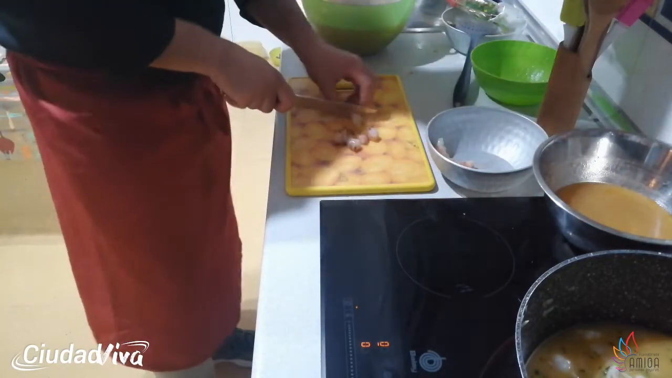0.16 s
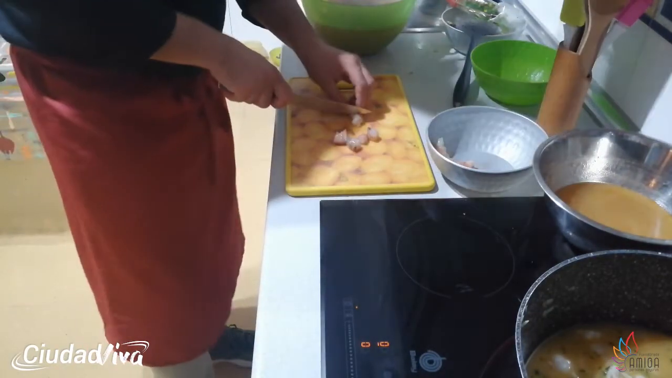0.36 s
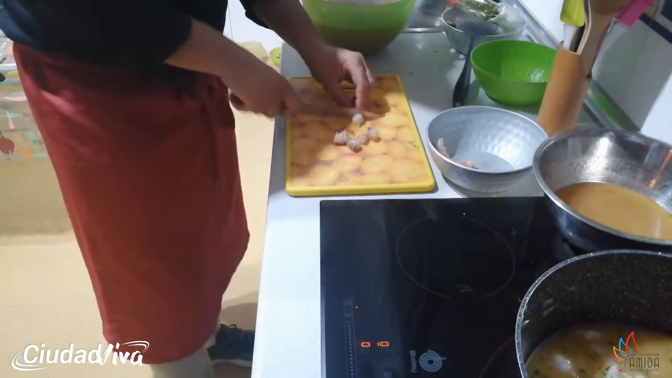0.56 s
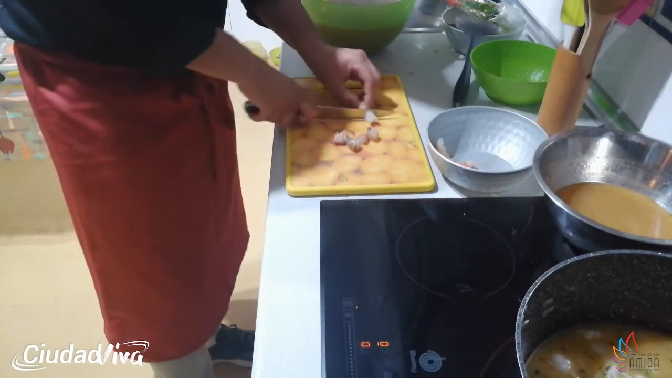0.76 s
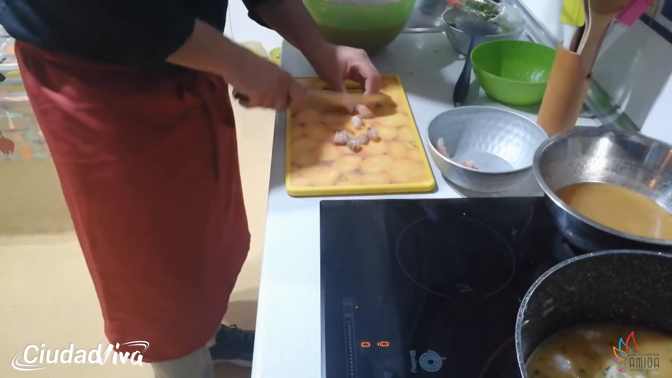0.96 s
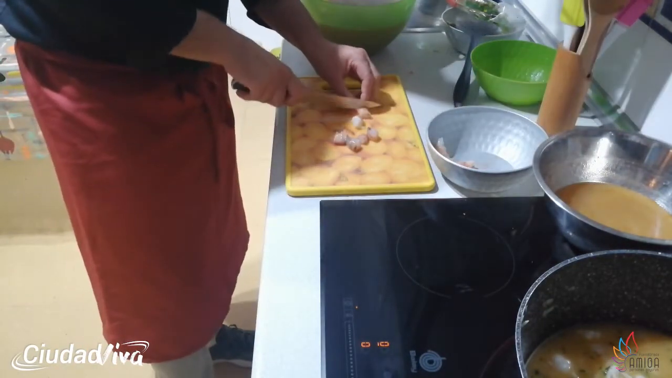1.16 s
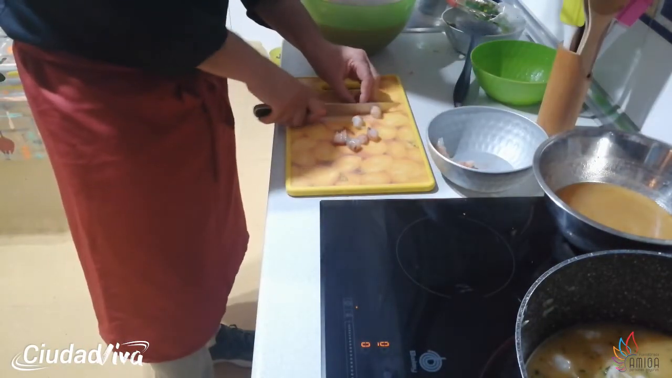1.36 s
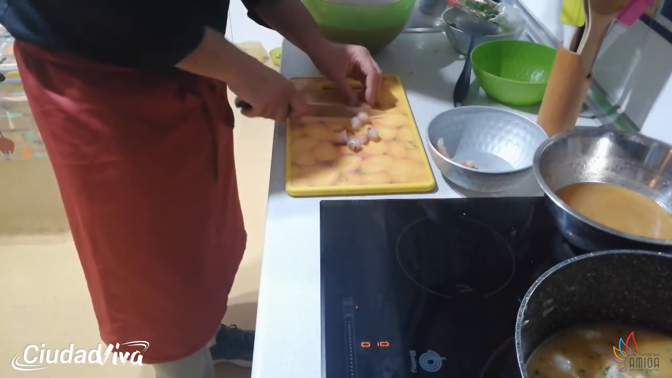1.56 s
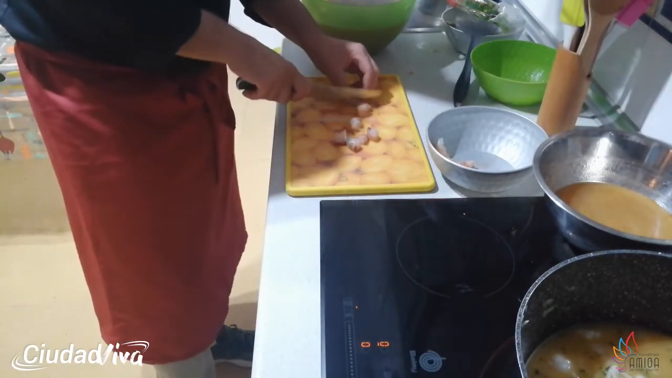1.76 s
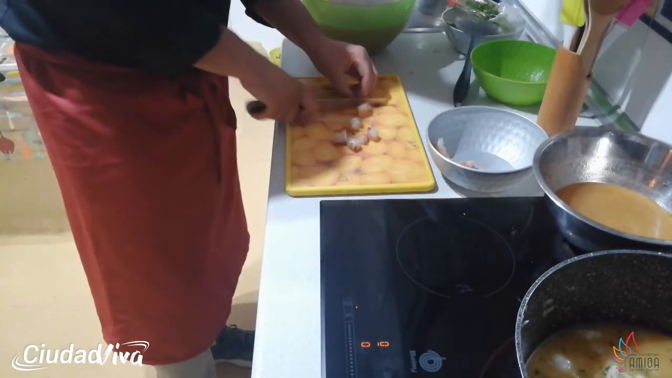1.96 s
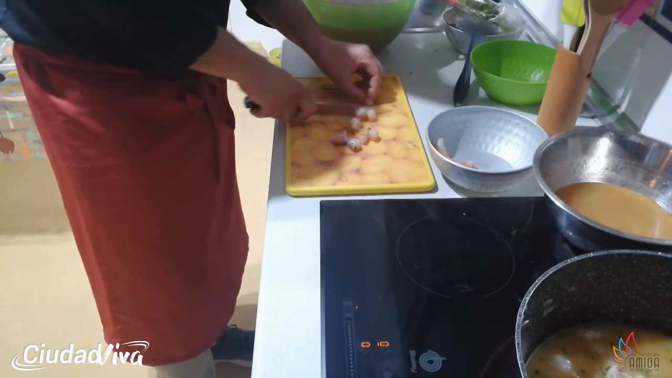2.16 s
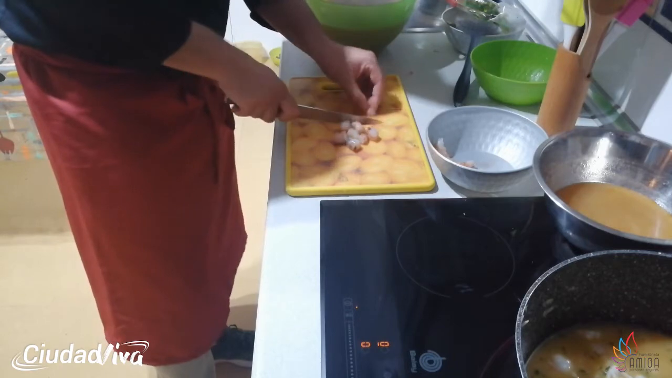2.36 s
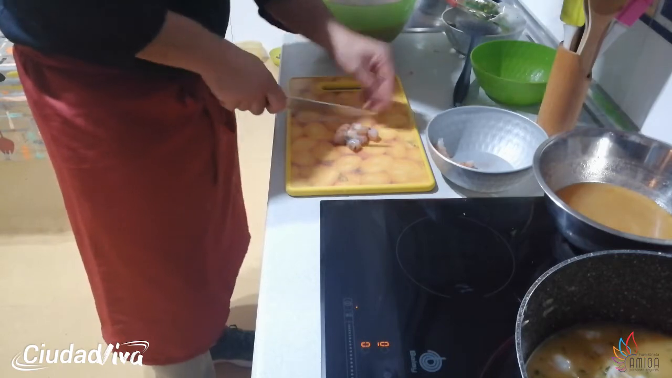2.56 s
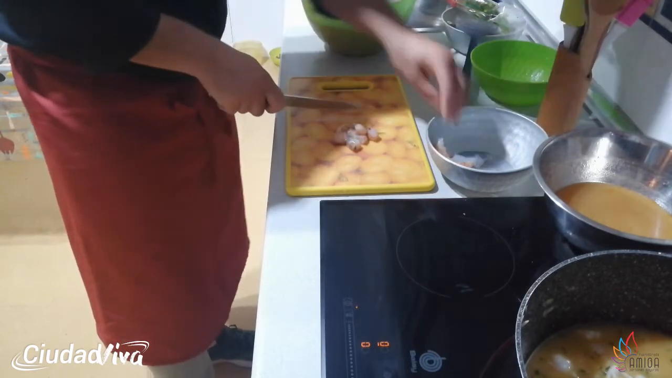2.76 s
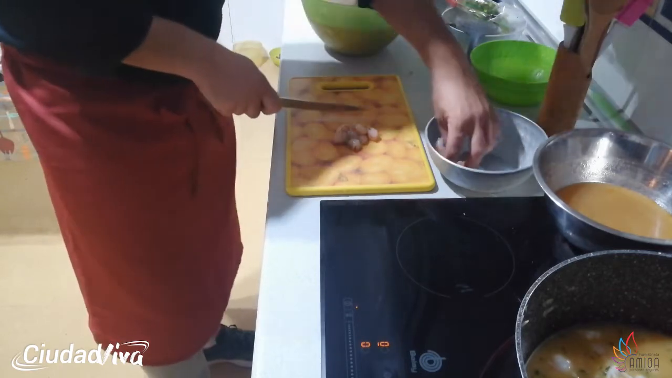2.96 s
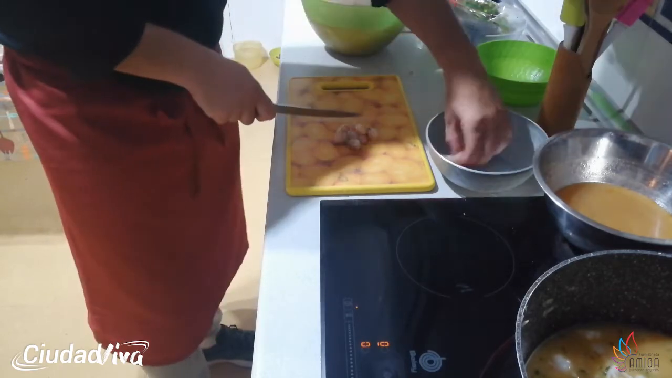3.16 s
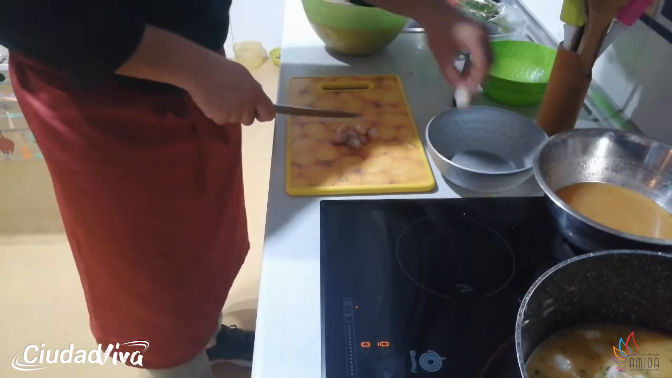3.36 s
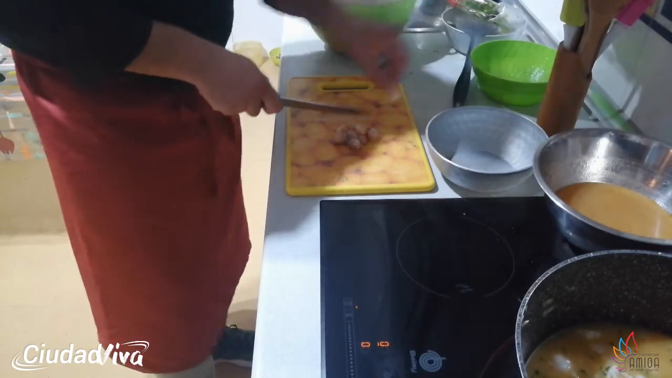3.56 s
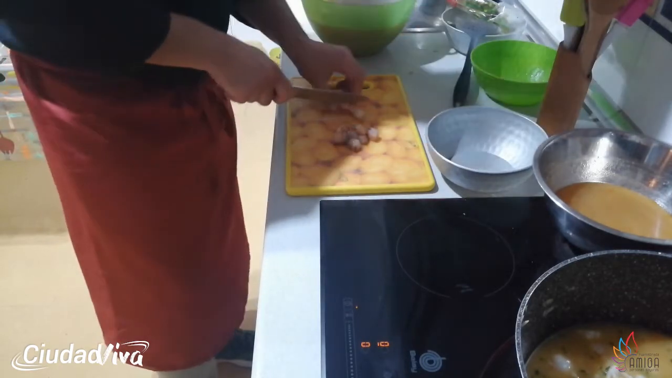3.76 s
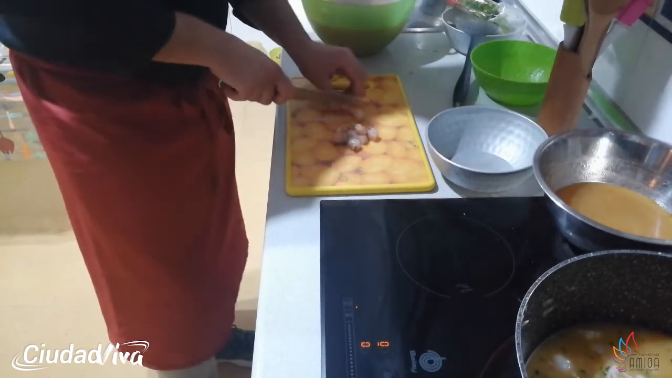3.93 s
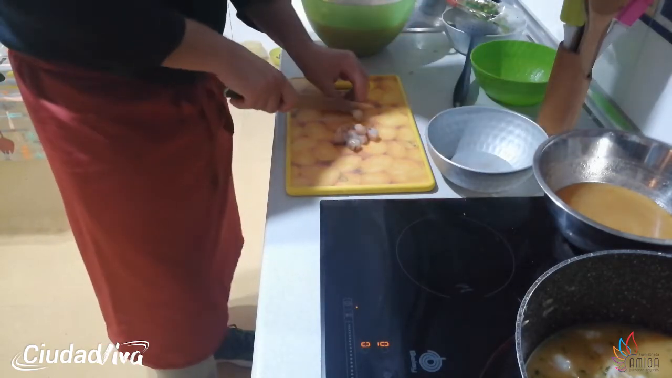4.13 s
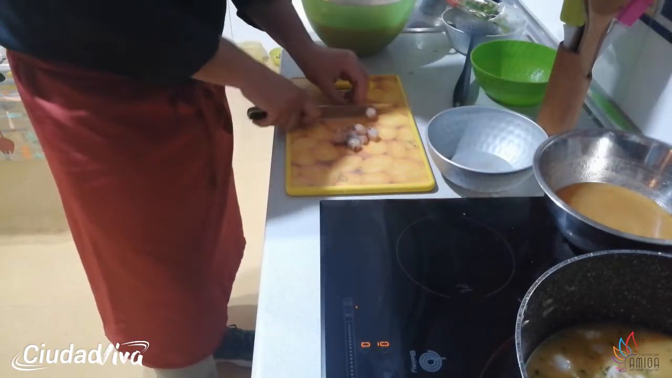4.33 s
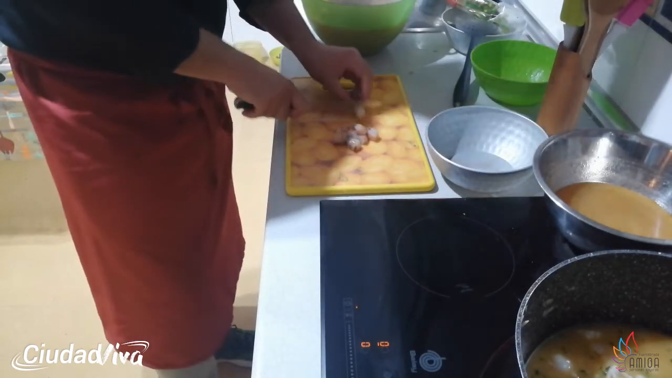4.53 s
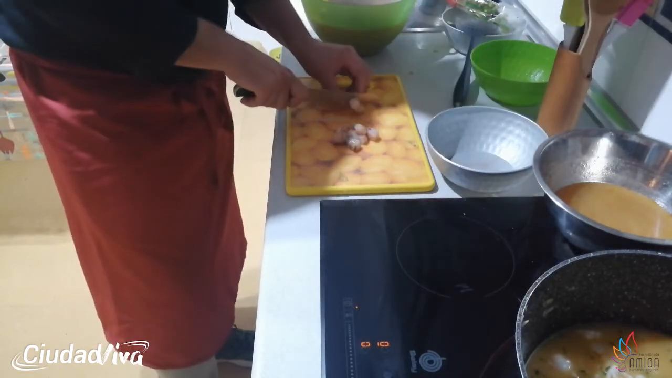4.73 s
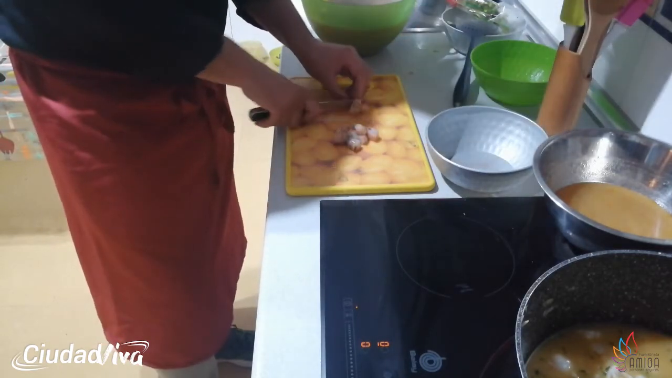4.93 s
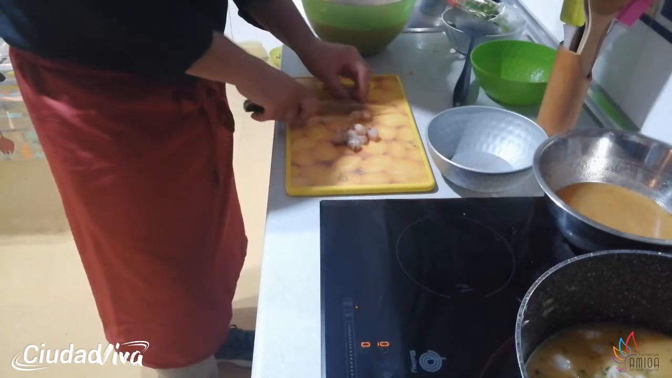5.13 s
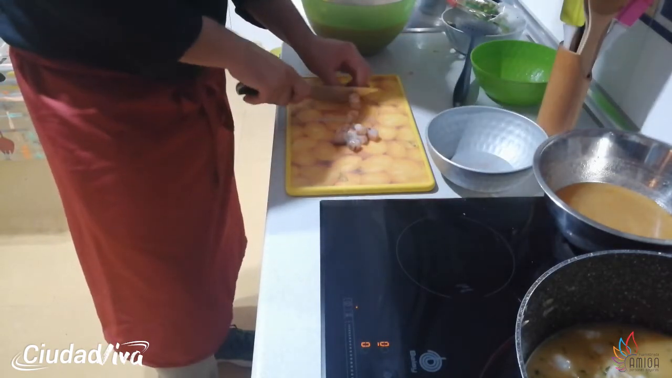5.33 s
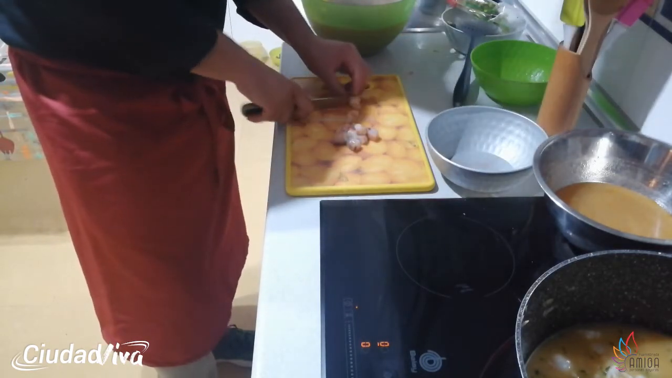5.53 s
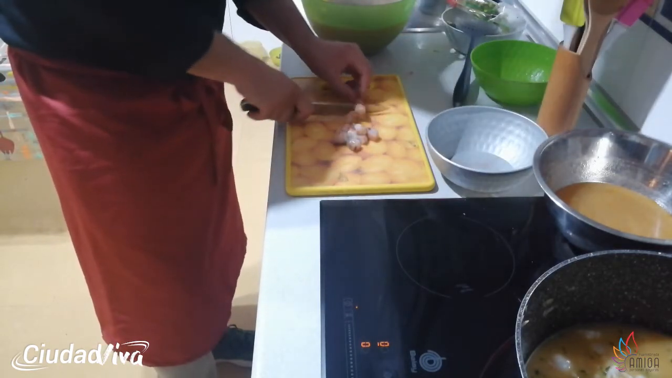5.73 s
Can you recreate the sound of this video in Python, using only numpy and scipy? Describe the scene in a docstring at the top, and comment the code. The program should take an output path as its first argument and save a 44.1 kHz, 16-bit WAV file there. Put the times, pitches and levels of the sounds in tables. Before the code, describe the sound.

Slow knife chops knock on a plastic cutting board, blade hissing between cuts, pieces dropped softly into a metal bowl, quiet kitchen hum.

```python
"""Knife on a plastic board

A small tiled kitchen on one microphone, the same in both channels. Each cut ends in a knock, built from damped
modes and a crunch of noise, and slips of the steel edge hiss, rub the board and ring the blade.
Midway pieces rustle off the fingers and tap a bowl; squeaks are short falling sines. An appliance hums
in steady lines over a rush of air. Room tails answer the knife, fingers and bowl."""
import sys
import numpy as np
from scipy import signal
from scipy.fft import rfft, irfft, next_fast_len
from scipy.io import wavfile
from scipy.ndimage import map_coordinates

SR = 44100
rng = np.random.default_rng(int(sys.argv[2]) if len(sys.argv) > 2 else 0)


def to_wav(s):
    """Save 16-bit WAV."""
    ch = np.atleast_2d(s).T  # columns
    pcm = np.round(np.clip(ch, -1, 1) * 32767)  # PCM
    wavfile.write(sys.argv[1], SR, pcm.astype(np.int16))


N = 259925  # length [samples]
TOP_HZ = 7750  # upper limit of the recorder, and of the modes that hard contact reaches
SPLIT_HZ = 1700  # modes below it make the thud, the others the clack


def amp(db):
    """Amplitude factor of a level in dB."""
    return 10 ** (np.asarray(db) / 20)


def unit(x):
    """Scale x to rms 1."""
    return x / np.sqrt(np.mean(x ** 2) + 1e-20)


def burst(x):
    """Scale a short sound to the energy of 20 ms at rms 1."""
    return x * np.sqrt(SR / 50 / np.sum(x ** 2))


def along(points, hz):
    """Interpolate (frequency [Hz], value) points on a log frequency axis."""
    f, v = np.transpose(points)
    return np.interp(np.log(hz + 1), np.log(f + 1), v)


def filtered(x, response):
    """Multiply the spectrum of x by a response of frequency."""
    n = x.shape[-1]
    padded = next_fast_len(n + 8192)
    spectrum = rfft(x, padded) * response(np.fft.rfftfreq(padded, 1 / SR))
    return irfft(spectrum, padded)[..., :n]


def coloured(x, spectrum):
    """Shape x by (frequency [Hz], relative level [dB]) points, at rms 1."""
    return unit(filtered(x, lambda hz: amp(along(spectrum, hz))))


def band(x, lo_hz, hi_hz):
    """Causal band-pass."""
    sos = signal.butter(2, [lo_hz, hi_hz], "band", fs=SR, output="sos")
    return signal.sosfilt(sos, x)


def wobble(rate, size):
    """A smooth random curve with rate knots a second."""
    knots = rng.standard_normal(size // 20 + 4)
    return map_coordinates(knots, [np.arange(size) * rate / SR], mode="wrap")


def fade(t, t60):
    """Exponential decay that falls 60 dB in t60 seconds."""
    return np.exp(-np.log(1000) * t / t60)


def add(track, s, sound):
    """Mix a sound into the track at time s."""
    start = max(round(s * SR), 0)
    track[start:start + len(sound)] += sound[:N - start]


# the appliance's tonal lines: (frequency [Hz], mean rms level [dB])
HUM_LINES = [(100, -68), (146.5, -70), (198, -79), (243, -57.5), (441, -80.5), (586, -78), (876, -81.5)]
# its rush of air: (frequency [Hz], relative level [dB per Hz])
AIR_SPECTRUM = [(20, -15), (50, -10), (75, -17.5), (130, -8), (190, -16), (300, -15), (500, -16),
                (750, -22.5), (1500, -31.5), (3100, -28), (4270, -37.5), (5770, -25), (7040, -36),
                (7780, -52.5)]


def appliance(air_db):
    """Slightly unsteady motor and mains lines over a soft rush of air."""
    t, hum = np.arange(N) / SR, np.zeros(N)
    for hz, db in HUM_LINES:
        level = .6 * wobble(5, N)  # dB
        drift = .3 * wobble(4, N)  # rad
        hum += amp(db + level) * np.sqrt(2) * np.sin(2 * np.pi * hz * t + drift)
    air_level = amp(air_db + .25 * wobble(41, N))
    return hum + air_level * coloured(rng.standard_normal(N), AIR_SPECTRUM)


# decay of the room: (frequency [Hz], t60 [s])
ROOM_DECAY = [(150, 0.74), (500, 0.46), (1400, 0.36), (3000, 0.39), (7000, 0.38)]


def kitchen(x, wet_db, build):
    """Add a diffuse tail that builds up over build seconds and dies at each frequency's own speed."""
    hz, t, z = signal.stft(rng.standard_normal(SR // 2), SR, nperseg=256)
    decaying = z * fade(t, along(ROOM_DECAY, hz)[:, None])
    tail = signal.istft(decaying, SR, nperseg=256)[1]
    tail = tail * (1 - np.exp(-np.arange(len(tail)) / SR / build))
    return x + amp(wet_db) * signal.fftconvolve(x, tail / np.linalg.norm(tail))[:len(x)]


def near_wall(x, delay, share):
    """Sound bounces three times between the worktop and the nearby walls."""
    def bounces(hz):
        one = np.clip(share, 0, .9) * np.exp(-2j * np.pi * hz * delay)
        return sum(one ** k for k in range(4))  # k = 0 is the direct sound
    return filtered(x, bounces)


# the fingers let go of the pieces: (time of the loudest moment [s], level before colouring and room [dB])
RUSTLES = [(2.921, -62.5), (3.12, -53)]
RUSTLE_RISE_DB_PER_S, RUSTLE_FALL_DB_PER_S = 221, 205


def fingers(grain_db=3):
    """Moist pieces slide off the fingers into the bowl: each rustle swells and dies away."""
    t, level = np.arange(N) / SR, np.zeros(N)
    for s, db in RUSTLES:
        drop_db = np.maximum(RUSTLE_RISE_DB_PER_S * (s - t), RUSTLE_FALL_DB_PER_S * (t - s))
        level += amp(db - drop_db)
    grains = unit(amp(grain_db * wobble(500, N)) * rng.standard_normal(N))
    rustle = coloured(grains, [(300, -12.0), (900, 2), (1600, 0), (3000, -1),
                               (4200, -9.5), (5700, -8), (7000, -9.5), (7800, -32)])
    return kitchen(level * rustle, wet_db=-7, build=.01)


# the wet blade squeaks in the food:
# (time [s], length [s], starting pitch before jitter [Hz], level at the peak of the swell, before room [dB])
SQUEAKS = [(0.848, 0.051, 4500, -71), (.85, 0.2, 1823, -68.5), (0.848, 0.11, 3150, -65),
           (0.883, .046, 6000, -59.5), (1.53, 0.036, 4730, -65), (1.566, 0.024, 5920, -50),
           (4.045, .09, 5210, -64.5)]
SQUEAK_SAG = .055  # share by which the pitch falls during a squeak


def squeaks(jitter):
    """Stick and slip make short, rough, falling whistles; jitter [Hz] roughens the pitch."""
    out = np.zeros(N)
    for s, length, start_hz, db in SQUEAKS:
        size = round(length * SR)
        falling = start_hz * (1 - SQUEAK_SAG * np.linspace(0, 1, size))
        hz = falling + jitter * wobble(520, size)
        whistle = np.sqrt(2) * np.sin(2 * np.pi * np.cumsum(hz) / SR)
        add(out, s, amp(db) * np.hanning(size) * whistle)
    return kitchen(out, wet_db=-1.5, build=0.0096)


def ring(modes, t):
    """Damped sines of the blade; they waver together as it flexes in the hand."""
    flex = .45 * wobble(70, len(t))  # rad
    total = np.zeros(len(t))
    for hz, db, t60 in modes:
        level = amp(db + rng.standard_normal())  # each stroke excites the modes a little differently
        total += level * fade(t, t60) * np.sin(2 * np.pi * hz * t + flex)
    return total


# hiss of the slipping edge: (frequency [Hz], relative level [dB per Hz])
HISS_SPECTRUM = [(1500, -65), (3000, -38), (4200, -11.5), (5200, 0.5), (5700, 5.5), (6300, 1), (6700, -3),
                 (7050, -2.5), (7400, -14), (7800, -16)]
# rub heard from the board: (frequency [Hz], relative level [dB per Hz])
RUB_SPECTRUM = [(150, -28.5), (500, -13.5), (900, -10), (1200, 9), (1700, -5.5), (2200, -3.5), (2700, 6),
                (3300, -1.5), (4500, -23.5), (7000, -35.5)]


def stroke(rise, fall, board_db, rings, grain_db=1.0, hiss_db=-3.5):
    """Tiny slips of the moving edge hiss, rub the board and keep the steel ringing; rings = [(modes, dB)]."""
    t = np.arange(SR * 3 // 5) / SR
    speed = np.interp(t, [0, rise, rise + fall], [0, 1, 0])
    grip = amp(grain_db * wobble(900, len(t)) + wobble(98, len(t)))
    slips = unit(grip * rng.standard_normal(len(t)))
    hiss = amp(hiss_db) * coloured(slips, HISS_SPECTRUM)
    rub = amp(board_db) * coloured(slips, RUB_SPECTRUM)
    rubbing = speed * (hiss + rub)
    for modes, db in rings:
        steel = signal.fftconvolve(speed * slips, ring(modes, t))[:len(t)]
        # scaled to the energy of the speed curve
        rubbing = rubbing + amp(db) * steel * np.linalg.norm(speed) / np.linalg.norm(steel)
    return kitchen(rubbing, wet_db=-6.0, build=0.0061)


# the blade nudges the pieces along, barely touching the board:
# (time [s], length [s], level before the stroke's own trims [dB])
NUDGES = [(0.821, 0.12, -55.5), (1.519, 0.18, -52.5), (2.534, 0.11, -52.5), (3.562, 0.72, -60)]
NUDGE_RISE = 0.31  # share of a nudge in which the edge gathers speed
# modes of the steel, shared by every stroke: (frequency [Hz], mean relative level [dB], t60 [s])
BLADE_MODES = [(1190, -15, .1), (1424, -14, .22), (2530, -17, .24), (2695, -12, .18), (3190, -15, .14),
               (3668, -17, .25), (3885, -21, .27), (4740, -12, .1), (5135, -7, .14), (5262, -5, .1),
               (5440, -2, .12), (5528, -5, .21), (5755, -8, .14), (6360, -7, .18), (7010, -9, .14)]


def nudges(board_db, blade_db):
    """Light strokes are mostly hiss."""
    out = np.zeros(N)
    for s, length, db in NUDGES:
        rise, fall = NUDGE_RISE * length, (1 - NUDGE_RISE) * length
        add(out, s, amp(db) * stroke(rise, fall, board_db, [(BLADE_MODES, blade_db)]))
    return out


# the edge is drawn back over the board: (time [s], length [s], hiss level [dB], board level [dB],
# mode that sings [Hz], its level [dB]); levels before the trims of the scrape and stroke
SCRAPES = [(0.96, 0.047, -54, -63, 2695, -56), (1.605, 0.063, -31, -48, 2695, -44),
           (2.214, 0.091, -29.5, -36, 5528, -32), (2.254, 0.054, -28.5, -56, 6360, -32.5),
           (4.527, 0.082, -39.5, -46, 3885, -61), (5.143, 0.083, -34.5, -43, 6360, -49),
           (5.747, 0.11, -33.5, -42.5, 7010, -52)]
SCRAPE_RISE = 0.23  # share of a scrape in which the edge gathers speed


def scrapes(board_db, blade_db, sing_db):
    """Drawn back hard, the whole blade rings, and the friction locks on to one mode, which sings out."""
    out = np.zeros(N)
    for s, length, db, board, near_hz, sing in SCRAPES:
        mode = min(BLADE_MODES, key=lambda m: abs(m[0] - near_hz))
        # db scales the whole stroke, so the other levels are given relative to it
        rings = [(BLADE_MODES, blade_db), ([mode], sing_db + sing - db)]
        rise, fall = SCRAPE_RISE * length, (1 - SCRAPE_RISE) * length
        add(out, s, amp(db) * stroke(rise, fall, board_db + board - db, rings))
    return out


SLICE_LEAD_S, SLICE_RISE_S, SLICE_FALL_S = .026, 0.024, 0.15  # the edge enters just before the knock


def slicing(board_db, blade_db):
    """The edge slides through the food around every chop."""
    out = np.zeros(N)
    for s, *_, db in CHOPS:
        slide = stroke(SLICE_RISE_S, SLICE_FALL_S, board_db, [(BLADE_MODES, blade_db)])
        add(out, s - SLICE_LEAD_S, amp(db) * slide)
    return out


def modal(modes, t, contact_hz):
    """A blow rings the modes; a soft contact hardly reaches those above contact_hz."""
    total = np.zeros(len(t))
    for k, (hz, db, t60) in enumerate(modes):
        reached_db = db - 10 * np.log10(1 + (hz / contact_hz) ** 8)
        level = (-1) ** k * amp(reached_db + rng.standard_normal())  # signs alternate
        total += level * fade(t, t60) * np.cos(2 * np.pi * hz * t)
    return total


# parting food: (frequency [Hz], relative level [dB per Hz])
CRUNCH_SPECTRUM = [(2500, -53), (4000, -10.5), (4700, -1.5), (5800, -1), (6500, -4.5), (7200, -21.5),
                   (7800, -25.5)]
# push on the worktop: (frequency [Hz], relative level [dB per Hz])
PUSH_SPECTRUM = [(25, -5), (50, -8.5), (85, -13), (150, -4), (200, -13.5), (290, -3.5), (500, -30),
                 (2000, -62.5)]
PUSH_GROWS = 0.31  # dB of push per dB of thud: the weight of the arm varies little
CHATTER_T60 = .025  # s


def knocks(events, modes, thud_db, clack_db, crunch_db, push_db, wet_db, soft_hz):
    """Each blow rings the low modes; hard contact adds the high ones, parting food a crunch."""
    out, t = np.zeros(N), np.arange(SR * 3 // 5) / SR
    low_modes = [m for m in modes if m[0] < SPLIT_HZ]
    high_modes = [m for m in modes if m[0] >= SPLIT_HZ]
    for s, thud, clack, crunch, *_ in events:
        # food under the edge cushions the blow: less clack, and a deeper thud
        contact_hz = soft_hz * amp(0.41 * (clack - thud + 14))
        low = band(modal(low_modes, t, contact_hz), 330, 1900)
        high = modal(high_modes, t, TOP_HZ)
        # the contact chatters for a few milliseconds
        chatter = .08 * rng.standard_normal(len(t)) * fade(t, CHATTER_T60)
        high = high + signal.fftconvolve(high, chatter)[:len(t)]
        high = band(band(high, 1400, 3900), 1200, 3900)
        body = amp(thud + thud_db) * burst(low) + amp(clack + clack_db) * burst(high)
        crack = coloured(rng.standard_normal(len(t)), CRUNCH_SPECTRUM) * fade(t, 0.02)
        # the food parts a millisecond before the blow lands
        blow = amp(crunch + crunch_db) * burst(crack) + np.roll(body, SR // 1000)
        # the worktop gives way with a dull push
        dull = coloured(rng.standard_normal(len(t)), PUSH_SPECTRUM) * fade(t, 0.39)
        push = amp(push_db + PUSH_GROWS * thud) * burst(dull)
        walled = near_wall(blow, delay=.0046, share=.4)
        add(out, s, kitchen(walled, wet_db, build=0.00099) + push)
    return out


# fingers and food tap the bowl, levels before trims:
# (time [s], thud level [dB], clack level [dB], crunch level [dB])
DROPS = [(2.893, -52, -44.5, -57), (2.922, -50.5, -51, -53), (3.05, -42, -56, -62), (3.098, -44, -44, -70),
         (3.124, -48, -80, -65), (3.142, -30, -40, -45.5)]
# heavily damped modes of the bowl: (frequency [Hz], mean relative level [dB], t60 [s])
BOWL_MODES = [(484, -1, 0.025), (733, -1, 0.059), (964, 4, 0.065), (1630, -2.5, 0.021), (1920, -4, 0.01),
              (2497, -4, 0.064), (2670, -1.5, 0.016), (3210, 3.5, 0.0072)]


def bowl_taps():
    """Soft taps ring the short modes of the bowl."""
    return knocks(DROPS, BOWL_MODES, thud_db=-5.0, clack_db=-6.0, crunch_db=-6.0, push_db=-41.5,
                  wet_db=-3.5, soft_hz=1080)


# each cut slices through the food and lands on the board, levels before trims:
# (time [s], thud level [dB], clack level [dB], crunch level [dB], slicing level [dB])
CHOPS = [(0.184, -61.5, -66.5, -68, -64), (0.685, -30.5, -47.5, -45, -51), (0.966, -60, -64, -60, -81),
         (1.37, -43, -57.5, -66, -52), (2.047, -33.5, -50.5, -47.5, -55.5),
         (4.342, -24.5, -26, -38.5, -60.5), (4.973, -24.5, -30, -49, -55), (5.604, -24, -25.5, -38, -56)]
# heavily damped modes of the board: (frequency [Hz], mean relative level [dB], t60 [s])
BOARD_MODES = [(400.5, -15.5, 0.21), (524.4, -9, 0.086), (604.5, -7.5, 0.048), (787.5, -4.5, 0.065),
               (869, -6, 0.037), (975, -1, 0.041), (1123, 2, 0.03), (1244, -5, 0.037), (1389, -1, 0.028),
               (1940, -4, 0.012), (2180, -3, 0.011), (2400, 0.5, 0.0094), (2720, 2, 0.0059),
               (3158, -1, 0.008)]


def board_chops():
    """The knife lands and rings the short modes of the plastic board."""
    return knocks(CHOPS, BOARD_MODES, thud_db=-3.5, clack_db=-7.0, crunch_db=-5.5, push_db=-39,
                  wet_db=-2.5, soft_hz=912)


def scene():
    """All sources reach one microphone."""
    background = appliance(air_db=-64.0)
    pieces = fingers() + bowl_taps()
    edge = nudges(board_db=-13, blade_db=-20) + slicing(board_db=-6, blade_db=-17)
    edge = edge + scrapes(board_db=-1.5, blade_db=-8.5, sing_db=0.5)
    mono = background + pieces + squeaks(jitter=97) + edge + board_chops()
    return np.array([mono, mono])


def record(dry):
    """The recorder rolls off over its last 300 Hz and keeps nothing above its band limit."""
    return filtered(dry, lambda hz: np.clip((TOP_HZ - hz) / 300, 0, 1))


dry = scene()
out = record(dry)
to_wav(out)
```